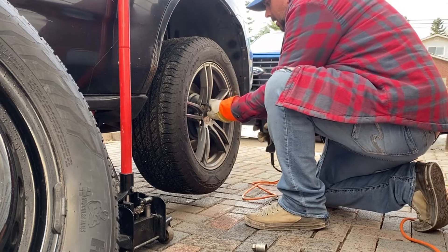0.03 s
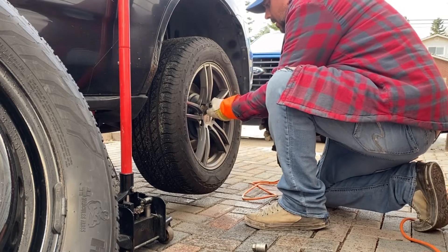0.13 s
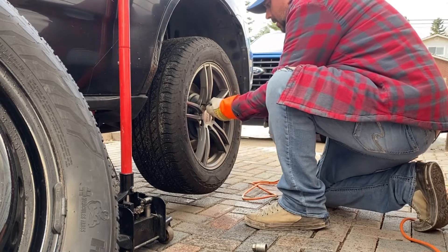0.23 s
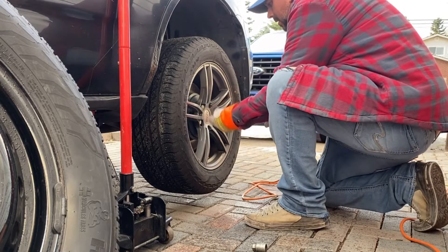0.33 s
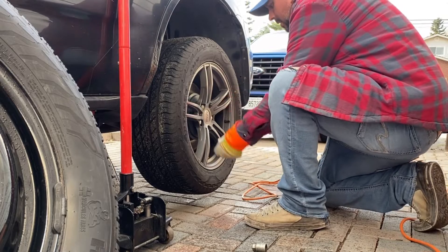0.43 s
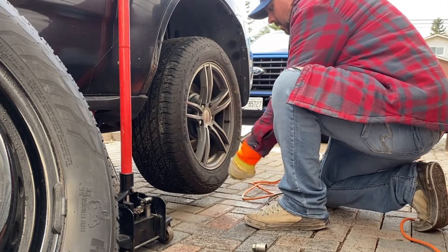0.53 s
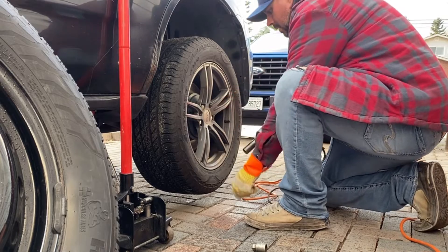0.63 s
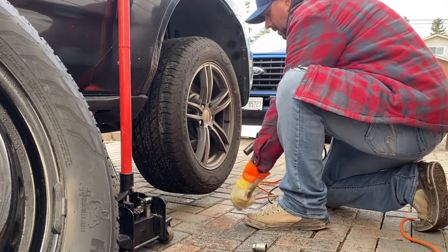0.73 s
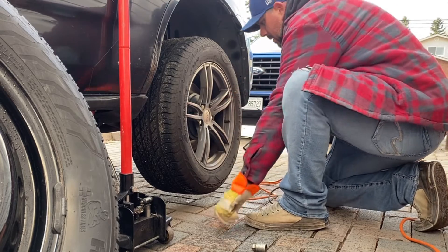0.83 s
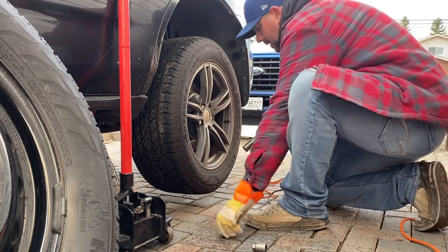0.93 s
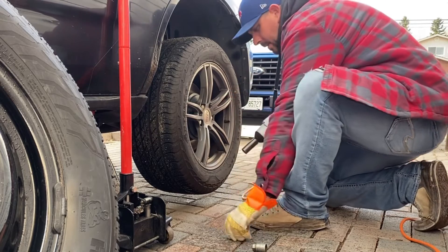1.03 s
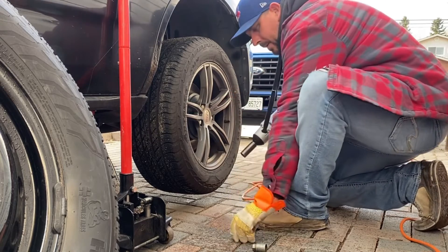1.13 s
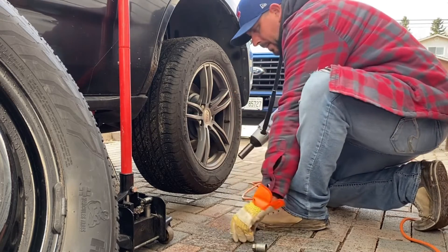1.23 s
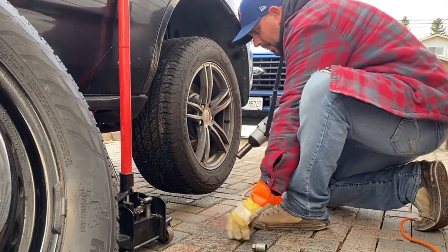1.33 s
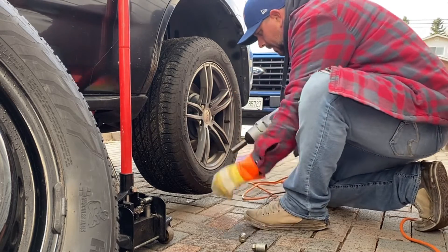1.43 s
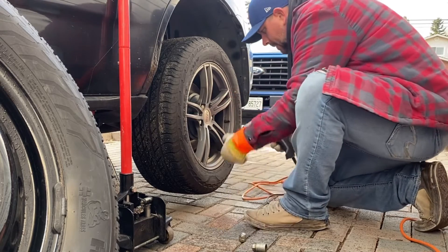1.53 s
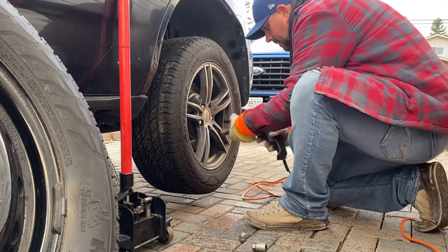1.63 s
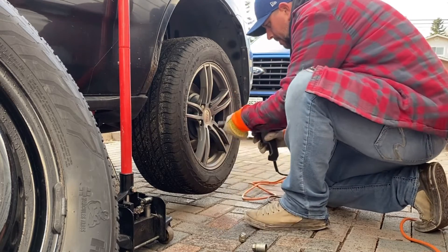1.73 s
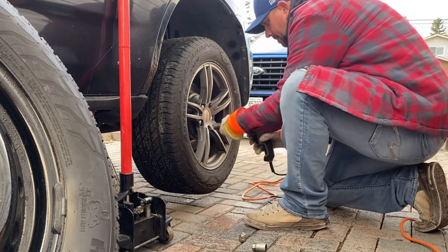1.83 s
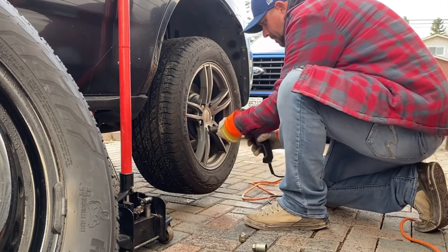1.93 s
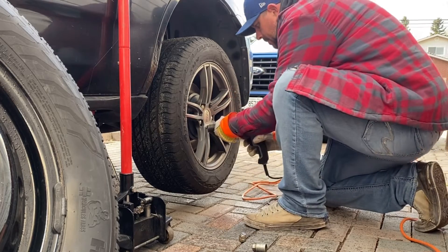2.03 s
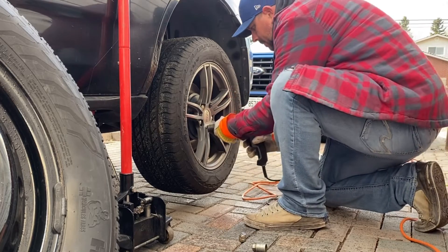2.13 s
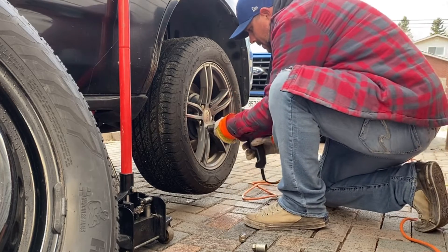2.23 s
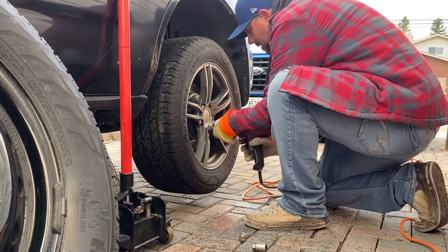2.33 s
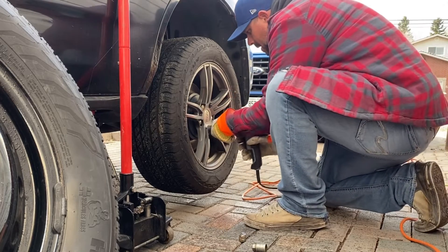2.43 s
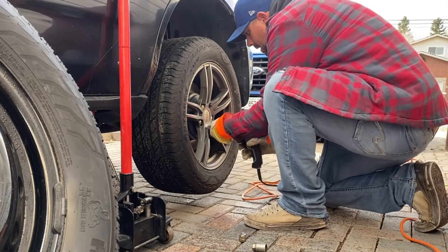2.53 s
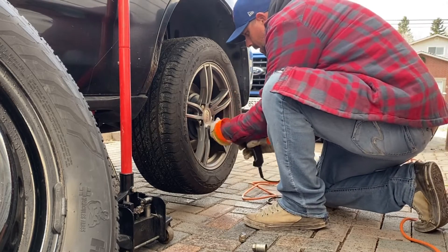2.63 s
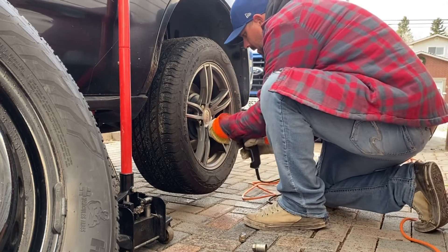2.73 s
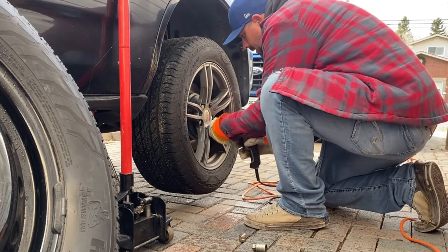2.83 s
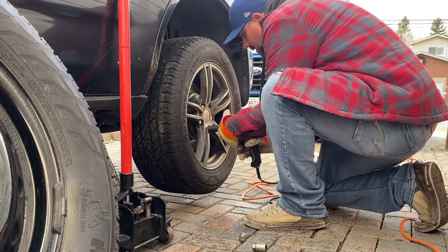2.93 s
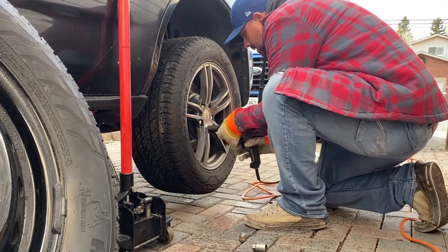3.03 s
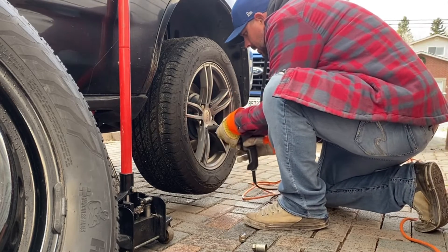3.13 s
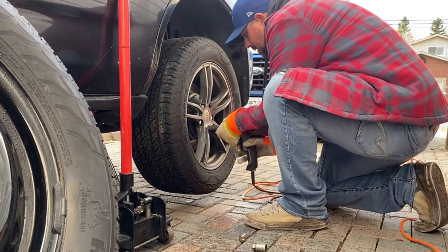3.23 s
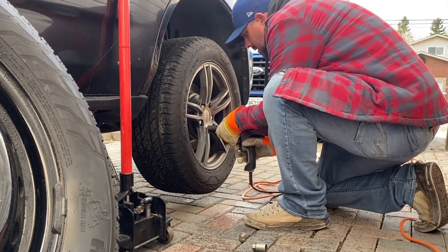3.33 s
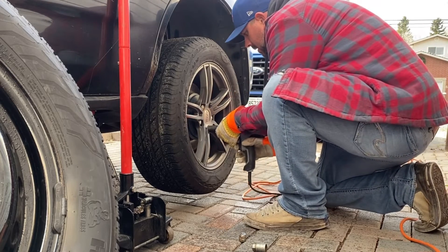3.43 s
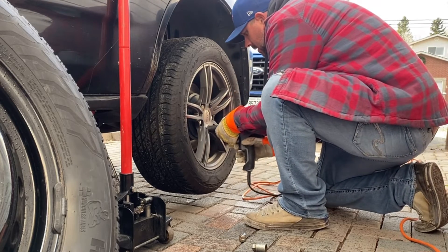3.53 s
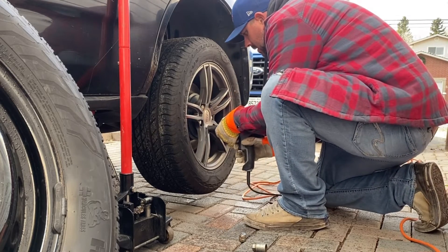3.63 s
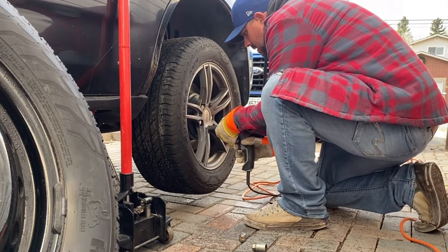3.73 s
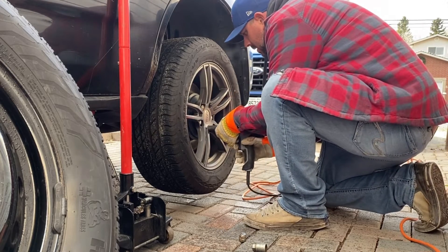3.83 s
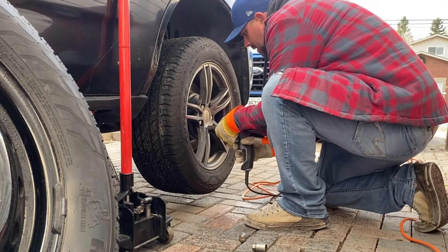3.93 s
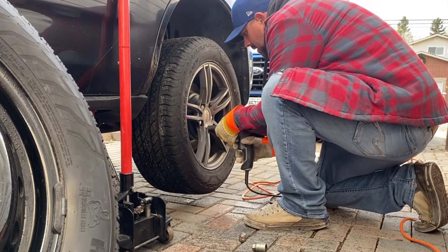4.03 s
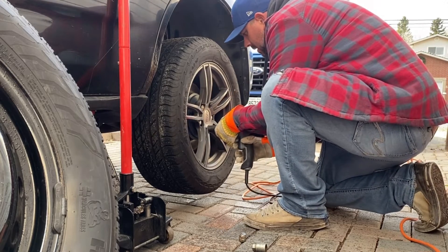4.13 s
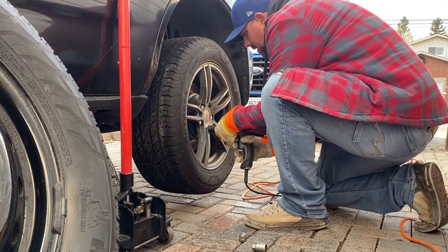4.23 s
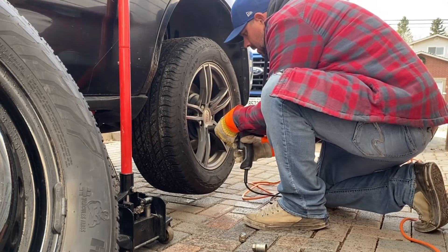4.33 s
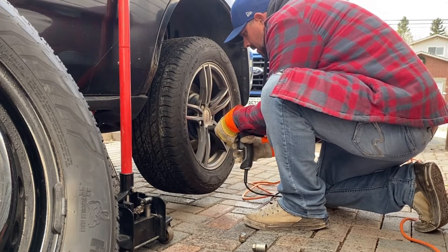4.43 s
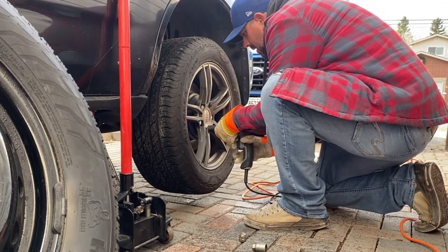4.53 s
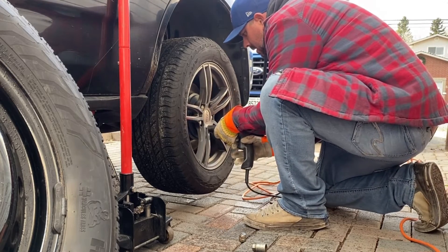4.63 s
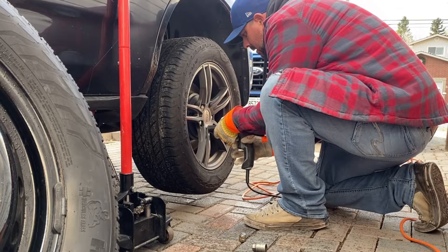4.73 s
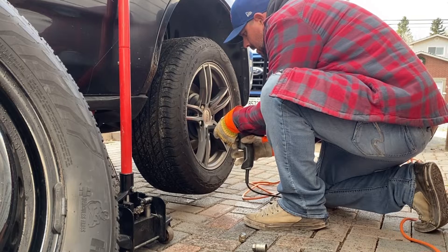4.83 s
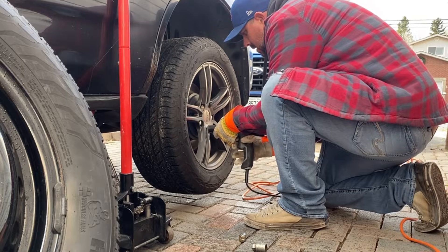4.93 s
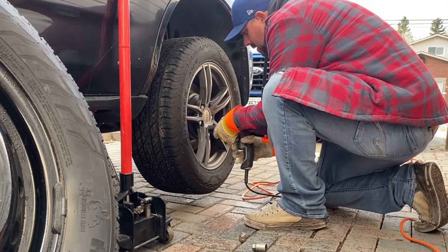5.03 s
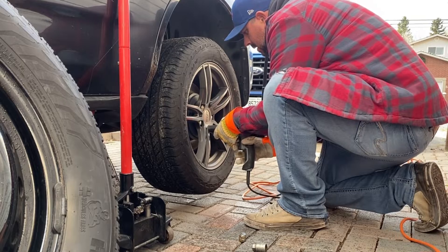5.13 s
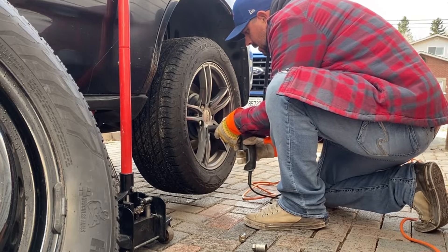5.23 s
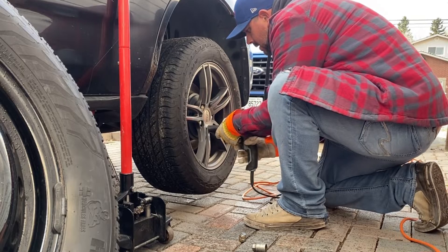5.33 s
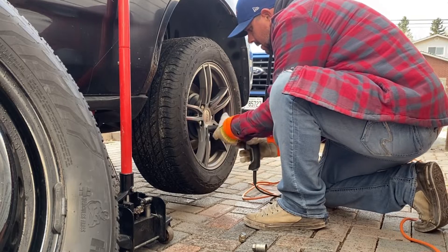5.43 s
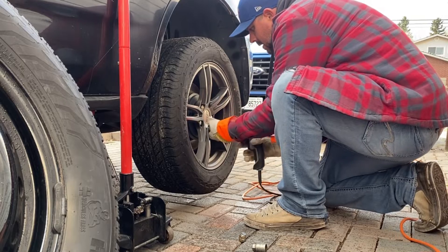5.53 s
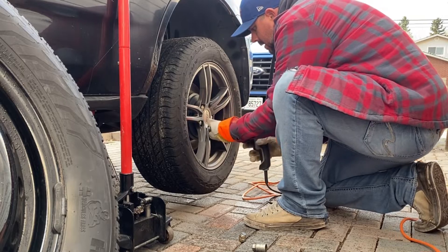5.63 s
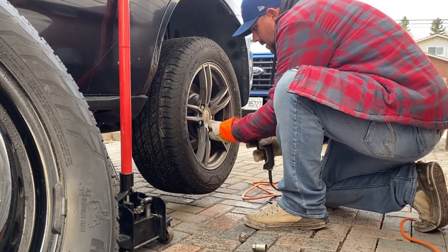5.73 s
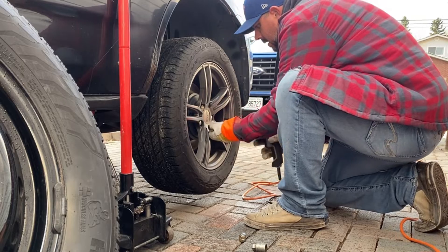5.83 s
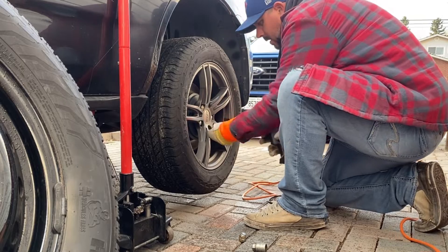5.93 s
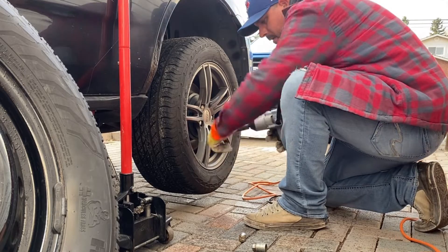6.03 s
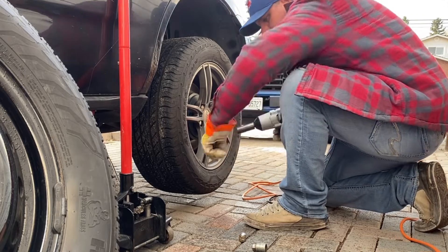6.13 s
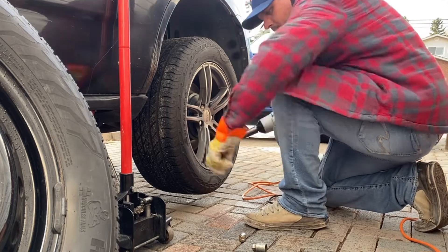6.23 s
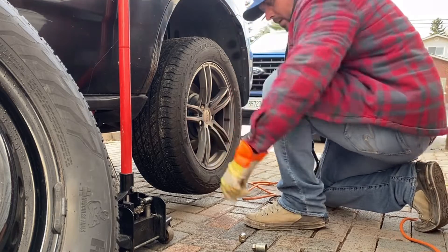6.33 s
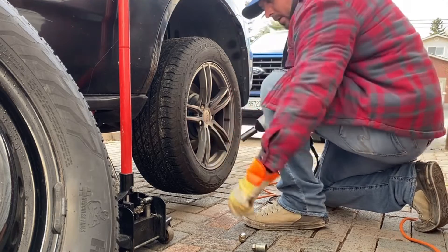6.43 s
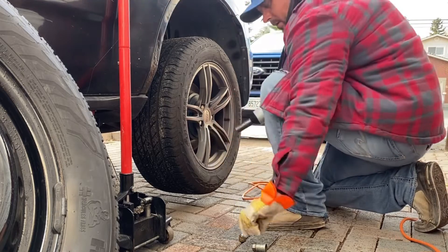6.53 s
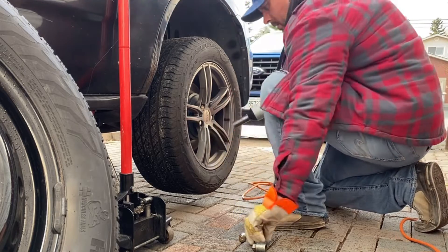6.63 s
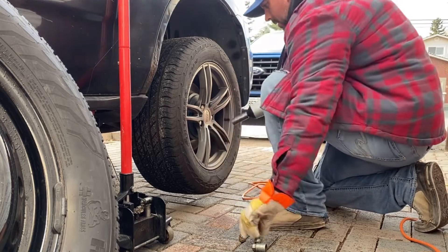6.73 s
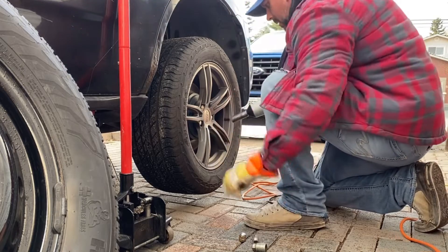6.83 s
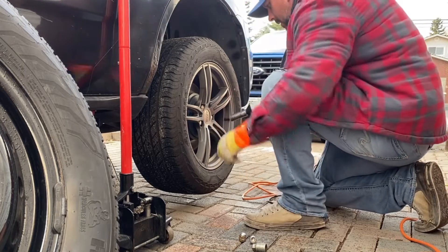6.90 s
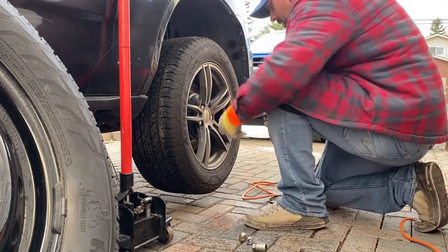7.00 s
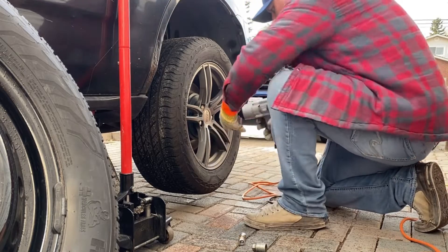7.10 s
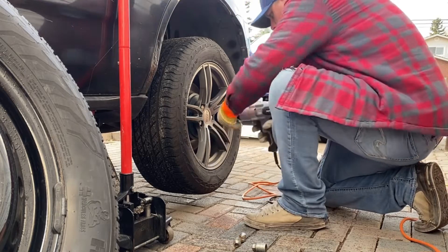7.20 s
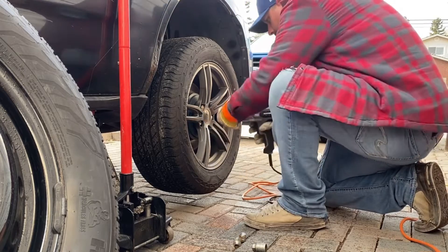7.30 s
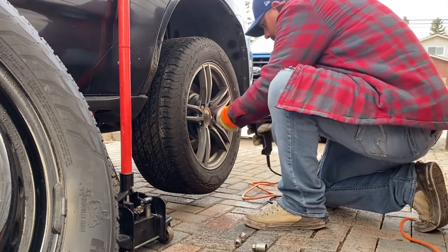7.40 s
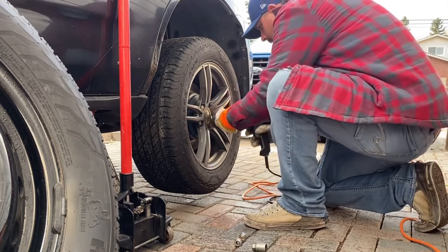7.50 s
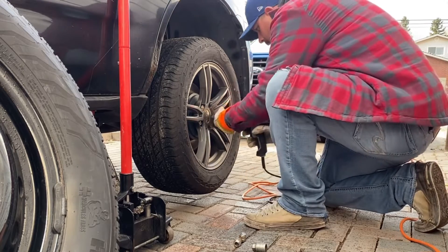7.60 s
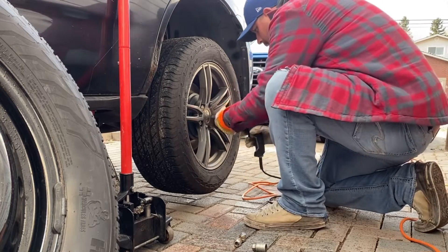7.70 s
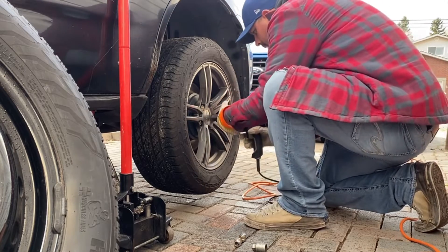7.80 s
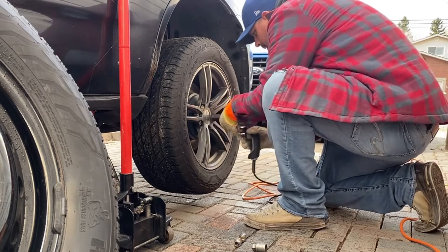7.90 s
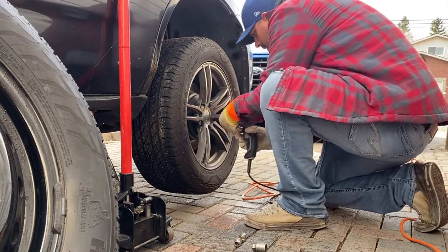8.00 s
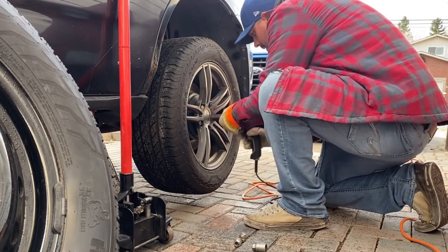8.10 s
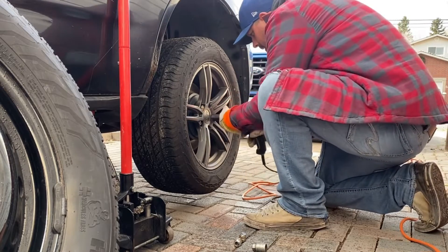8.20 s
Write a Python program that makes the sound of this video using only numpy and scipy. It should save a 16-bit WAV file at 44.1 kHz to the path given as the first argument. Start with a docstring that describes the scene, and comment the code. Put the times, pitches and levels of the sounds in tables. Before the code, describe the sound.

A gear-whining electric motor spins freely, then falls in pitch and fades. Dull clunks and a sharp metallic clack seat the socket, with a tiny squeak. Harsh, machine-gun hammering on steel erupts, gradually easing, then a freed motor whirs and winds down. A small nut clicks and bounces on paving, followed by soft gloved knocks. Near microphone in an open driveway, slight reflections from bricks and cars, low traffic hum, loudest blows slightly clipped.

```python
"""Corded impact wrench on wheel nuts

Outdoors on paving, the motor (tooth, commutator and fan tones, gear rattle, brush hiss) coasts down; the steel
socket rubs, squeaks and is knocked onto the next nut (ringing modes). The hammer strikes the anvil forty times
a second (noise bursts through steel resonances, pushes that ring rim and tyre) until the nut lets go. The motor
runs free and coasts down again; the nut drops on the bricks (short modes). Distant traffic hums (coloured noise).
"""
import sys
import numpy as np
from scipy import signal
from scipy.fft import rfft, irfft, next_fast_len
from scipy.io import wavfile
from scipy.ndimage import uniform_filter1d, map_coordinates

SR = 44100
rng = np.random.default_rng(int(sys.argv[2]) if len(sys.argv) > 2 else 0)


def generate_wav(sig):
    """Save sig (samples, or channels by samples) to the path in sys.argv[1] as 16-bit PCM at SR."""
    pcm = np.round(np.clip(np.atleast_2d(sig).T, -1, 1) * 32767).astype(np.int16)
    wavfile.write(sys.argv[1], SR, pcm)


N = 364266

# All dB are relative settings unless a source adds no further gain.
# Hammer blows. Each row: time in seconds, crack level in dB, clang over it in dB.
BLOW_EVENTS = [(3.2245, 1, -11), (3.2547, 2.5, -13.5), (3.2797, 1.5, -7), (3.3062, 2, -7.5),
               (3.3334, 1, -10), (3.3601, 1.5, -10.5), (3.3862, 2.5, -15.5), (3.4118, -1.5, -10.5),
               (3.4368, -0.5, -10.5), (3.4624, -1.5, -7), (3.4886, 0, -13.5), (3.5135, 2, -11.5),
               (3.5391, 0, -16.5), (3.5636, 0, -8), (3.5886, -1, -10), (3.6136, -1, -10.5),
               (3.6383, 1.5, -7.5), (3.6637, -2, -10.5), (3.6882, -0.5, -10.5), (3.7122, -0.5, -13.5),
               (3.7376, 3, -13.5), (3.7619, -0.5, -13.5), (3.787, 2, -13), (3.8119, -1, -13.5),
               (3.8367, 2, -14.5), (3.862, -2, -8.5), (3.8864, -2, -11.5), (3.9118, -2.5, -11),
               (3.9371, -1.5, -10.5), (3.9622, -2.5, -11.5), (3.987, 1, -13.5), (4.0128, -0.5, -13.5),
               (4.0383, -0.5, -12), (4.0634, -2, -11.5), (4.0882, -2, -14), (4.1139, -4, -10),
               (4.1396, -4, -9), (4.1648, -2, -11), (4.1901, 0.5, -17.5), (4.216, -2, -8), (4.242, -1, -12),
               (4.2677, -4, -8), (4.2944, 1.5, -15.5), (4.3193, -2, -9), (4.3449, 2, -15),
               (4.3703, -2.5, -8.5), (4.396, 3, -15.5), (4.4206, -6, -10), (4.444, 2, -14),
               (4.4698, -2, -7.5), (4.4949, -0.5, -15), (4.5198, -4, -9), (4.5447, -0.5, -11),
               (4.57, -4.5, -9), (4.5937, 0, -14), (4.6204, -5, -6), (4.644, -2.5, -15), (4.669, -3.5, -11),
               (4.6938, -1.5, -16.5), (4.7185, -2.5, -12), (4.7426, -3.5, -12.5), (4.7671, -7.5, -9),
               (4.7916, -4, -12.5), (4.8153, -4.5, -12.5), (4.8395, -4.5, -15), (4.863, -6.5, -14.5),
               (4.888, -5, -13.5), (4.912, -4.5, -14), (4.9338, -4.5, -12.5), (4.9583, -7, -13.5),
               (4.9813, -6.5, -10), (5.0067, -7.5, -12.5), (5.0292, -7, -10), (5.0536, -8.5, -8),
               (5.0775, -10, -4.5), (5.1016, -9.5, -5), (5.125, -11, -2), (5.151, -11, -9.5),
               (5.1806, -15, -4.5)]
# Anvil, socket and wheel resonances. Each row: centre in Hz, width in Hz, level in dB.
ANVIL_MODES = [(1834, 120, -2.5), (2634, 350, 2), (3530, 180, -6), (4030, 300, 6.5), (5650, 140, -8.5),
               (6400, 52, -2), (6460, 84, -11.5), (8280, 86, -0.5), (8250, 220, -13.5), (9000, 41, -18.5),
               (9630, 220, -9.5), (10000, 72, -12.5), (10000, 54, -10), (10900, 310, -19), (12550, 97, -8),
               (13350, 260, -17.5)]
# Bright colour of a blow. Each row: frequency in Hz, level in dB per Hz.
CRACK_SPECTRUM = [(600, -60), (1710, -25), (2900, 4.5), (3250, -6), (4780, -7.5), (5560, -2.5),
                  (7500, -2.5), (8840, -7), (13500, -10), (16000, -14)]
# Darker colour of a blow. Each row: frequency in Hz, level in dB per Hz.
CLANG_SPECTRUM = [(500, -60), (800, -26), (1000, -10), (1250, -5), (1890, -9), (2520, 0), (3300, -5),
                  (4290, -31), (7260, -120)]
# Gears and hammer cam grinding under load. Each row: time in seconds, mid level in dB, treble over it in dB.
GRIND_LEVELS = [(3.17, -29.5, -5.5), (3.19, -16.5, -15.5), (3.215, -23.5, -14), (3.24, -16.5, -3.5),
                (3.4, -27.5, -4.5), (4.9, -27, -9), (5.2, -30, -9)]
# Wheel under the blows. Each row: time in seconds, rim level in dB, tyre over it in dB.
WHEEL_LEVELS = [(3.2, -27, 2.5), (3.27, -28.5, -4.5), (3.46, -35.5, -6), (4.15, -35, -9), (4.63, -36, -7.5),
                (4.85, -37.5, -6.5), (5.0, -43, -0.5), (5.22, -50, 5)]
# Rim resonances. Each row: centre in Hz, width in Hz, level in dB.
RIM_MODES = [(230, 90, -13), (320, 80, -11), (441, 20, 3), (600, 70, -8), (720, 60, -7), (925, 50, -9),
             (1080, 70, -13)]
# Tyre resonances. Each row: centre in Hz, width in Hz, level in dB.
TYRE_MODES = [(74.8, 3.5, 9), (100, 12, -0.5), (120, 5, 1.5), (139, 11, -2), (161.6, 7.1, -3)]
# Stud and hub resonances. Each row: centre in Hz, width in Hz, level in dB.
HUB_MODES = [(1290, 50, -8), (1560, 40, -8), (2380, 60, -4), (2545, 55, 3), (2690, 50, -2), (2810, 60, -3),
             (3040, 80, -5)]
# Noise that shakes the rim. Each row: frequency in Hz, level in dB per Hz.
SHAKE_SPECTRUM = [(50, -8), (150, -4), (250, -7.5), (900, 1.5), (1300, -32.5)]

# Free runs of the motor. Each row: free from in seconds, trigger let go in seconds, first speed in turns/s,
# friction in turns/s per second.
FREE_RUNS = [(0, .467, 263, 104), (5.22, 5.59, 219, 91)]
# Full-speed settings of each run. Each row: rattle in dB, whine in dB, fan tone in dB.
RUN_LEVELS = [(-35.5, -33, -40.5), (-40, -39, -48)]
# Overtones of the commutator bar rate. One column: level in dB.
BAR_LEVELS_DB = [-2, -3, -3, -6]
# How the housing radiates the tooth whine. Each row: frequency in Hz, gain in dB.
SHELL_GAIN = [(300, -40), (700, -20), (1000, -8), (1200, -2), (1450, 0), (1600, -4), (1800, 2), (2050, 1),
              (2200, -4), (2380, 5), (2700, -8), (3000, 4), (3300, -8), (3600, -5), (3800, -17), (4230, -9),
              (4340, -22), (5000, -22), (7000, -14), (12000, -14), (16000, -17)]
# How the vents radiate the commutator whine. Each row: frequency in Hz, gain in dB.
VENT_GAIN = [(1500, -24), (4500, -17), (6000, -14), (7000, -7), (8000, -13), (10000, -12), (12500, -8),
             (16000, -13)]
# Housing resonances. Each row: centre in Hz, width in Hz, level in dB.
HOUSING_MODES = [(1300, 210, 8.5), (2120, 200, -5), (2340, 150, 10), (3080, 68, 0), (3660, 110, 13),
                 (6500, 3000, -9.5), (10500, 5900, -3)]
# Gear rattle colour. Each row: frequency in Hz, level in dB per Hz.
RATTLE_SPECTRUM = [(150, -59), (250, -56), (329, -10), (544, -12), (833, -7), (1200, -14), (2030, -1.5),
                   (2130, -4), (2710, -7), (3610, -9), (5000, -21), (6500, -25), (11000, -120)]
# Brush hiss colour. Each row: frequency in Hz, level in dB per Hz.
BRUSH_SPECTRUM = [(2650, -19), (4500, -7.5), (6190, -3.5), (9070, -7), (10700, -4.5), (11500, -5),
                  (14000, -6.5), (16000, -23.5)]

# Socket, trigger and glove contacts, and a nut set down on the bricks at 1.258 s. Each row: time in seconds,
# level in dB, treble over it in dB, rim over it in dB, tyre over it in dB, t60 of knock and tick in seconds.
CONTACTS = [(1.258, -33.5, -30, -15, -20, 0.073), (1.699, -54, 13.5, -11, -15, 0.039),
            (2.136, -40.5, -32, -8, -5, 0.1), (2.147, -58, -27, -12, -15, 0.08),
            (2.179, -27.5, -44, -12, -12, 0.065), (2.208, -41.5, -22, -9, 6, 0.052),
            (2.233, -63, -18, -13, -5, 0.062), (2.425, -34, -43, -37, -4, 0.098),
            (2.558, -52, -28, -13, -14, 0.1), (2.611, -26, -14, -4, -5, 0.039),
            (2.756, -43.5, -26, -16, 11, 0.31), (2.784, -16.5, -1, -0.5, -4, 0.079),
            (3.064, -53.5, -21, -25, -4, 0.087), (3.148, -36.5, 4, -26, -16, 0.17),
            (3.173, -23, 9.5, -28, -17, 0.1), (3.181, -13, -9, -28, -9, 0.09),
            (7.113, -53.5, -16.5, -15, -7.5, 0.069), (7.136, -58.5, -16, -17, -12, .06),
            (7.236, -59.5, -23, -18, -4, 0.082), (7.285, -51, -7.5, -18, -20.5, 0.088),
            (7.313, -57, -19.5, -19, -12.5, 0.054), (7.525, -69, -24, -13, -3, 0.07),
            (7.645, -45, -28, -21.5, -2.5, 0.044), (7.662, -49, -30, -25, -11.5, 0.07),
            (7.787, -31, -10, -7.5, -9, 0.09), (8.16, -57, -23, -23, -12, 0.061),
            (8.202, -62.5, 7, -15, -9, 0.048)]
# Socket modes. Each row: frequency in Hz, level in dB, t60 in seconds undamped.
SOCKET_MODES = [(1141, -2.5, 0.15), (1273, -4.5, 0.33), (1350, -2, 0.21), (1740, -4.5, 0.18),
                (2075, -4, .12), (2400, -7, 0.16), (2830, -4.5, 0.072), (2870, -8.5, 0.12),
                (3450, -5.5, 0.3), (3804, 0, .12), (4530, -13.5, 0.15)]
# Dull part of a contact. Each row: frequency in Hz, level in dB per Hz.
KNOCK_SPECTRUM = [(240, -19.5), (400, 1), (526, -7), (852, -10), (1310, 1.5), (1960, -5), (2520, -1.5),
                  (5500, -31), (7150, -65), (12100, -120)]
# Bright part of a contact. Each row: frequency in Hz, level in dB per Hz.
TICK_SPECTRUM = [(2650, -22.5), (4400, -3), (5960, -6), (6590, -7), (13500, -25.5), (16000, -26.5)]

# Nut on the bricks. Each row: time in seconds, level in dB, treble over it in dB.
NUT_DROPS = [(6.719, -26, -16.5), (6.83, -33.5, -32.5), (6.869, -40, -33), (6.894, -46, -36),
             (6.912, -48, -32.5), (6.924, -54, -26), (7.012, -61, -40), (7.035, -63, -40),
             (7.365, -59.5, -30), (7.38, -62.5, -29.5), (7.546, -64, -25), (7.664, -56, -30)]
# Nut modes. Each row: frequency in Hz, level in dB, t60 in seconds undamped.
NUT_MODES = [(436, -22, .03), (780, -18, .02), (2300, 0, .045), (2480, -6, .03), (3060, -16, .03),
             (4170, -21, .02)]

# Rubbing strokes. Each row: start in seconds, length in seconds, rub level in dB, singing steel over it in dB,
# pitch of the singing as a ratio.
RUB_STROKES = [(1.685, 0.31, -63, -16, 1.01), (1.779, 0.2, -79.5, 17, 1.05), (2.513, 0.36, -79.5, 4, 0.98),
               (2.849, 0.27, -72, -22, 0.88), (6.694, .15, -74, -17.5, 1.01),
               (7.093, .07, -74.5, -18.5, 1.01), (7.703, 0.14, -71, -19, 1.01),
               (8.037, 0.21, -77, -19, 0.97)]
# Singing steel resonances. Each row: centre in Hz, width in Hz, level in dB.
SINGING_MODES = [(2890, 58, -3), (3600, 170, -5), (4470, 90, 5.5), (6430, 140, -6), (7600, 88, -6),
                 (9180, 170, -13), (11900, 84, -7), (12300, 36, -8), (12600, 120, -3), (13400, 100, -6)]
# Thin high squeaks of the socket. Each row: time in seconds, level in dB.
SQUEAKS = [(2.14, -74), (2.18, -62), (2.43, -79), (2.608, -58), (2.69, -76), (2.782, -43), (7.78, -51)]
# Rub colour. Each row: frequency in Hz, level in dB per Hz.
RUB_SPECTRUM = [(1000, -22.0), (2500, 2.5), (8000, -3.5), (14000, 0), (16000, -14.0)]
# Squeak colour. Each row: frequency in Hz, level in dB per Hz.
SQUEAK_SPECTRUM = [(12000, -20), (12700, 2), (14000, 5), (14800, -34)]
# Squeak resonances. Each row: centre in Hz, width in Hz, level in dB.
SQUEAK_MODES = [(12700, 200, 1.5), (13620, 400, -2.5)]

# Traffic level. Each row: time in seconds, hum in dB.
STREET_LEVELS = [(0, -61.5), (1, -57), (2, -55.5), (3, -50), (5.5, -56.5), (6.2, -62.5), (7, -61),
                 (7.9, -59.5), (8.26, -60)]
# Traffic colour. Each row: frequency in Hz, level in dB per Hz.
HUM_SPECTRUM = [(15, -43), (32, -19.5), (55, 0), (86, 2), (113, -0.5), (361, -20), (857, -20.5),
                (1590, -27), (1820, -29), (2200, -29.5), (2460, -32.5), (4450, -40.5), (13100, -48),
                (14600, -44.5), (15800, -57.5)]

PAVING_S = .0065  # detour of the sound by way of the bricks and the car
TOP_HZ = 15900
RIM_FEELS, TYRE_FEELS = .3, 1.6  # share of a blow's unevenness in dB that reaches rim and tyre
TEETH, BARS, BLADES = 8, 30, 40  # pinion, commutator, fan
FREE_TURNS_PER_S, SPIN_UP_S, DRAG_S = 278, .32, 1.1  # free speed; time constants
RATTLE_DB_PER_OCT, WHINE_DB_PER_OCT = 12, 7  # lost each time the speed halves
HISS_DB, HISS_DB_PER_OCT = 1.5, 1  # over the rattle; lost on top of the rattle's fall
FAN_FADE_DB_PER_S = 190  # once the trigger is let go
TOOTH_OVERTONES, TOOTH_DB_PER_OCT = 16, 2.4  # number; fall from one octave of overtones to the next
LOW_FADE_DB_PER_OCT = 2  # extra fade of tooth tones as the rotor slows, divided by overtone number
DRIVEN_DB = -1  # whine while the motor still drives the gears
SLOW_RATTLE_DB, SLOW_DB_PER_OCT = -25.5, 1  # loose teeth against the rattle, down to the last turns
COGGING_TURNS_PER_S = .8  # rotor unsteadiness: blurs the whine at low speed
STROKE_EDGE_S = .04


def amp(db):
    """dB to gain."""
    return 10 ** (np.asarray(db) / 20)


def unit(x):
    """Scaled to rms 1."""
    return x / np.sqrt(np.mean(x ** 2) + 1e-20)


def curves(table, rest_db=-120):
    """One value per sample for each column; the first rests outside the table."""
    t = np.arange(N) / SR
    s, *cols = np.transpose(table)
    out = [np.interp(t, s, c) for c in cols]
    inside = (t >= s[0]) & (t <= s[-1])
    out[0] = uniform_filter1d(np.where(inside, out[0], rest_db), size=200)
    return out


def wobble(knots_per_s):
    """A smooth random curve."""
    knots = rng.standard_normal(int(N * knots_per_s / SR) + 4)
    return map_coordinates(knots, [np.arange(N) * knots_per_s / SR])


def filtered(x, response):
    """x through a complex response of frequency."""
    m = next_fast_len(N + SR // 2)
    return irfft(rfft(x, m) * response(np.fft.rfftfreq(m, 1 / SR)), m)[:N]


def colour(spectrum):
    """Gain interpolated between (Hz, dB) points on a log axis."""
    hz, db = np.transpose(spectrum)
    return lambda f: amp(np.interp(np.log(f + 1), np.log(hz + 1), db))


def modes(table, between_db=-120):
    """Causal resonances of alternating sign over a flat base."""
    def response(f):
        total = amp(between_db)
        for k, (hz, width, db) in enumerate(table):
            damping = 1j * f * width
            total = total + (-1) ** k * amp(db) * damping / (hz * hz - f * f + damping)
        return total
    return response


def noise(spectrum, body=lambda f: 1):
    """Coloured noise of rms 1, through a body."""
    tint = colour(spectrum)
    return unit(filtered(rng.standard_normal(N), lambda f: tint(f) * body(f)))


def spikes(s, db):
    """One impulse per event."""
    return np.bincount(np.round(s * SR).astype(int), amp(db), N)[:N]


def bursts(s, db, t60, hold_s, rise_s=0.0011):
    """Envelope of events that rise, hold briefly and die exponentially."""
    t = np.arange(SR // 4) / SR
    shape = (1 - np.exp(-t / rise_s)) * amp(-60 * np.maximum(t - hold_s, 0) / t60)
    return signal.fftconvolve(spikes(s, db), shape)[:N]


def ring(table, db, shorten):
    """One stroke of decaying sine modes, each scattered in strength."""
    t = np.arange(SR // 4) / SR
    out = np.zeros(len(t))
    for hz, mode_db, t60 in table:
        strength_db = db + mode_db + rng.normal(0, 3)
        out += amp(strength_db - 60 * t / (t60 * shorten)) * np.sin(2 * np.pi * hz * t)
    return out


def hammer():
    """Each blow excites steel with a short crack and a longer clang, and pushes the wheel into ringing."""
    s, db, clang_db, even_s = blows()
    steel = modes(ANVIL_MODES, between_db=-3.5)
    crack = bursts(s, db - 8.0, t60=.018, hold_s=0.003)
    late_crack = bursts(s + PAVING_S, db - 28.0, t60=0.2, hold_s=0.0011)
    clang = bursts(s, clang_db - 2, t60=0.067, hold_s=0.0015)
    struck = (crack + late_crack) * noise(CRACK_SPECTRUM, steel) + clang * noise(CLANG_SPECTRUM, steel)

    grind_db, bright_db = curves(GRIND_LEVELS)
    grind = noise(CLANG_SPECTRUM, steel) + amp(bright_db) * noise(CRACK_SPECTRUM, steel)
    grind *= amp(grind_db + 0.56 * wobble(77))

    # the heavy wheel keeps an even beat
    uneven_db = db - uniform_filter1d(db, size=6)
    rim_db, tyre_db = curves(WHEEL_LEVELS)
    rim = unit(filtered(spikes(even_s, RIM_FEELS * uneven_db), modes(RIM_MODES)))
    tyre = unit(filtered(spikes(even_s, TYRE_FEELS * uneven_db), modes(TYRE_MODES)))
    shake = amp(-2) * noise(SHAKE_SPECTRUM, modes(RIM_MODES))
    wheel = amp(rim_db - 2) * (rim + amp(tyre_db) * tyre + shake)

    chatter = bursts(s, clang_db, t60=0.015, hold_s=0.0041, rise_s=.002) * rng.standard_normal(N)
    hub = amp(6) * filtered(chatter, modes(HUB_MODES))  # rings on between the blows
    return struck + hub + grind + wheel


def blows():
    """Time, crack dB and clang dB of each blow, and the even beat behind them."""
    s, crack_db, clang_db = np.transpose(BLOW_EVENTS)
    steady = np.linspace(s[0], s[-1], len(s))
    return s, crack_db, crack_db + clang_db, steady + uniform_filter1d(s - steady, size=3)


def motor():
    """Tooth, bar and fan tones follow rotor speed; gear rattle and brush hiss throb once a turn."""
    speed, run, coasting_s = rotor()
    octaves = np.log2(speed / FREE_TURNS_PER_S)
    rattle_db, whine_db, fan_db = np.transpose(RUN_LEVELS)[:, run]
    turn = 2 * np.pi * np.cumsum(speed + COGGING_TURNS_PER_S * wobble(60)) / SR
    throb = 1 + 0.19 * np.sin(turn)

    def level(db, db_per_oct):
        return uniform_filter1d(amp(db + db_per_oct * octaves), size=400)

    def tone(per_turn, db):
        flutter_db = 3.8 * wobble(50) + 1.5 * wobble(12)
        audible = per_turn * speed < TOP_HZ
        return amp(db + flutter_db) * audible * np.sin(per_turn * turn + rng.uniform(0, 2 * np.pi))

    teeth = np.zeros(N)
    for k in range(1, TOOTH_OVERTONES + 1):
        teeth += tone(TEETH * k, -TOOTH_DB_PER_OCT * np.log2(k) + LOW_FADE_DB_PER_OCT * octaves / k)
    bars = sum(tone(BARS * (k + 1), db) for k, db in enumerate(BAR_LEVELS_DB))
    # runout: tooth sidebands a turn apart
    whine = filtered(bars, colour(VENT_GAIN)) + filtered(teeth * throb, colour(SHELL_GAIN))
    whine *= level(whine_db + DRIVEN_DB * (coasting_s == 0), WHINE_DB_PER_OCT)

    fan = tone(BLADES, 0) * level(fan_db - FAN_FADE_DB_PER_S * coasting_s, 0)
    fan *= octaves > -1  # silent below half speed

    rattle = noise(RATTLE_SPECTRUM, modes(HOUSING_MODES, between_db=12.0)) * amp(2.2 * wobble(25))
    hiss = amp(HISS_DB + HISS_DB_PER_OCT * octaves + 0.68 * wobble(30)) * noise(BRUSH_SPECTRUM)
    rough = level(rattle_db, RATTLE_DB_PER_OCT) * throb * (rattle + hiss)
    slow = level(rattle_db + SLOW_RATTLE_DB, SLOW_DB_PER_OCT) * np.clip(speed / 25, 0, 1) * rattle
    return whine + fan + slow + rough


def rotor():
    """Turns/s under drive, then drag and friction; the run in hand; seconds since its trigger was let go."""
    t = np.arange(N) / SR
    run = np.searchsorted([row[0] for row in FREE_RUNS], t, side="right") - 1
    start, release, first, friction = np.transpose(FREE_RUNS)[:, run]
    driven_s = np.minimum(t, release) - start
    driven = FREE_TURNS_PER_S - (FREE_TURNS_PER_S - first) * np.exp(-driven_s / SPIN_UP_S)
    coasting_s = np.maximum(t - release, 0)
    speed = (driven + friction * DRAG_S) * np.exp(-coasting_s / DRAG_S) - friction * DRAG_S
    return np.maximum(speed, 1e-3), run, coasting_s


def knocks():
    """Each contact: a dull knock, a tick, the socket's ring, the rim and a late boom of the tyre."""
    out, dull, bright = np.zeros(N + SR), noise(KNOCK_SPECTRUM), noise(TICK_SPECTRUM)
    t = np.arange(SR // 4) / SR
    for s, db, treble_db, _, _, t60 in CONTACTS:
        at = slice(round(s * SR), round(s * SR) + len(t))
        fade = (1 - np.exp(-t / .0008)) * amp(-60 * t / t60)
        stroke = ring(SOCKET_MODES, db - 16.5, shorten=0.43)  # held in a glove
        contact = amp(db - 5.5) * dull[at] + amp(db + treble_db - 10.5) * bright[at]
        stroke[:len(contact)] += contact * fade[:len(contact)]
        out[at] += stroke

    s, db, _, rim_db, tyre_db, _ = np.transpose(CONTACTS)
    rim_modes = modes(RIM_MODES)
    # a gloved push has no edge
    rim = filtered(spikes(s + 0.0028, db + rim_db + 45.0), lambda f: rim_modes(f) / (1 + 1j * f / 600) ** 2)
    tyre = filtered(spikes(s + 0.025, db + tyre_db + 51.0), modes(TYRE_MODES[1:]))
    return out[:N] + rim + tyre


def nut():
    """The nut bounces ever lower on the bricks, rolls and is nudged: damped modes, a crack and a tick."""
    out = np.zeros(N + SR)
    for s, db, _ in NUT_DROPS:
        out[round(s * SR):][:SR // 4] += ring(NUT_MODES, db + 0.5, shorten=0.62)
    s, db, treble_db = np.transpose(NUT_DROPS)
    crack = bursts(s, db - 16.5, t60=0.074, hold_s=.001) * noise(KNOCK_SPECTRUM)
    tick = bursts(s, db + treble_db + 7.0, t60=0.051, hold_s=0.0011) * noise(TICK_SPECTRUM)
    return out[:N] + crack + tick


def slide():
    """A faint grainy rub, at times singing in narrow steel resonances; short squeaks."""
    t = np.arange(N) / SR
    rub, out = noise(RUB_SPECTRUM), np.zeros(N)
    steel = modes(SINGING_MODES)
    for s, length, db, sing_db, pitch in RUB_STROKES:
        shape = np.clip(np.minimum(t - s, s + length - t) / STROKE_EDGE_S + .5, 0, 1)
        singing = noise(RUB_SPECTRUM, lambda f: steel(f / pitch))
        out += amp(db) * shape * (rub + amp(sing_db) * singing)
    s, db = np.transpose(SQUEAKS)
    squeak = noise(SQUEAK_SPECTRUM, modes(SQUEAK_MODES))
    squeak *= bursts(s, db, t60=0.054, hold_s=0.0067, rise_s=0.0024)
    return amp(1.5 * wobble(45)) * out + squeak


def street():
    """Distant traffic: coloured noise of wavering level."""
    return amp(curves(STREET_LEVELS)[0] + 1.8 * wobble(6)) * noise(HUM_SPECTRUM)


def scene():
    """The work, heard direct and once more off the paving, with a short dull tail from cars and walls."""
    work = hammer() + motor() + knocks() + nut() + slide()
    t = np.arange(SR // 3) / SR
    tail = rng.standard_normal(len(t)) * amp(-60 * t / .22) * (t > .012)
    yard = signal.fftconvolve(work, tail / np.linalg.norm(tail))[:N]
    yard = filtered(yard, lambda hz: 1 / (1 + 1j * hz / 3500) ** 2)
    bounce = np.pad(work, (round(PAVING_S * SR), 0))[:N]
    return (work + amp(-13) * bounce + amp(-13) * yard + street())[None]


def record(dry):
    """The microphone drops the deep bass; the loudest blows clip; nothing is kept above the band limit."""
    thin = filtered(dry[0], lambda hz: (1j * hz / (1j * hz + 45)) ** 2)
    clipped = thin / (1 + np.abs(thin / .95) ** 8) ** (1 / 8)
    return np.clip(filtered(clipped, lambda hz: hz < TOP_HZ), -1, 1)[None]


dry = scene()
out = record(dry)
generate_wav(out)
```